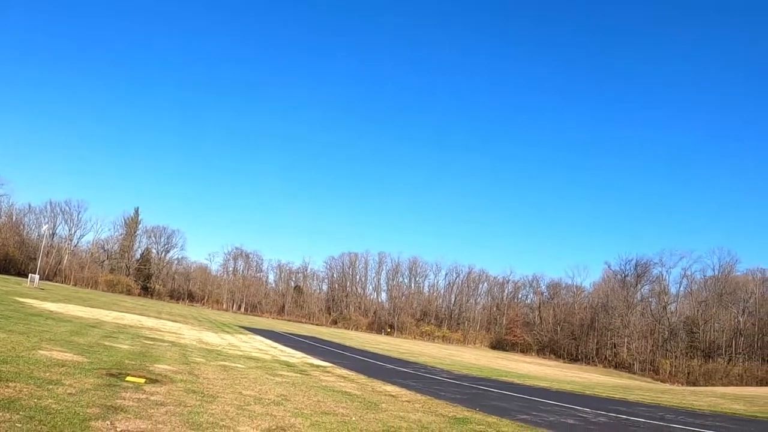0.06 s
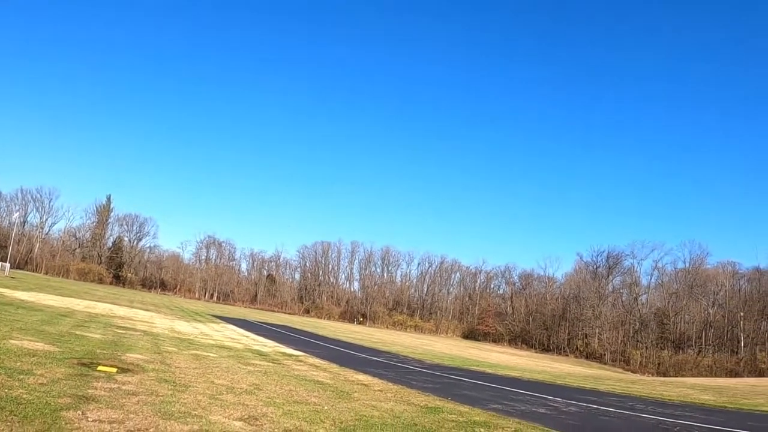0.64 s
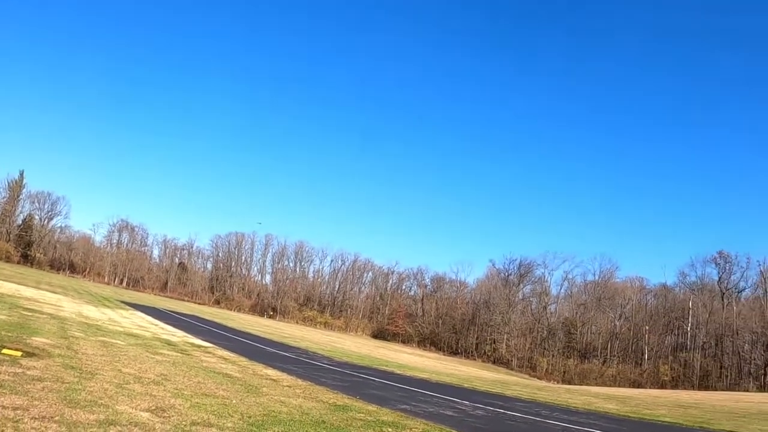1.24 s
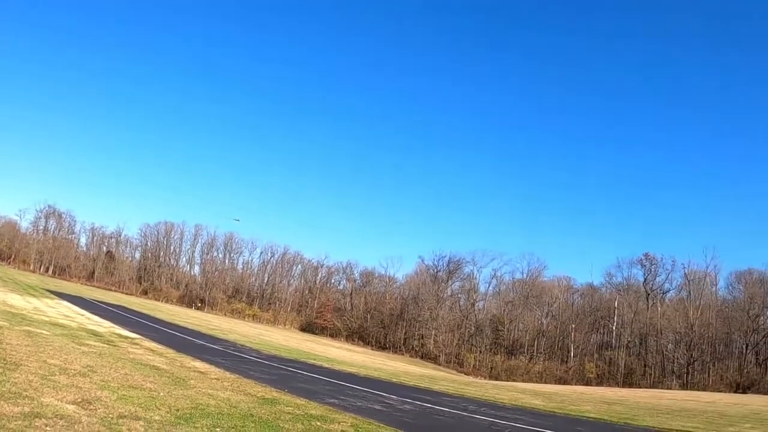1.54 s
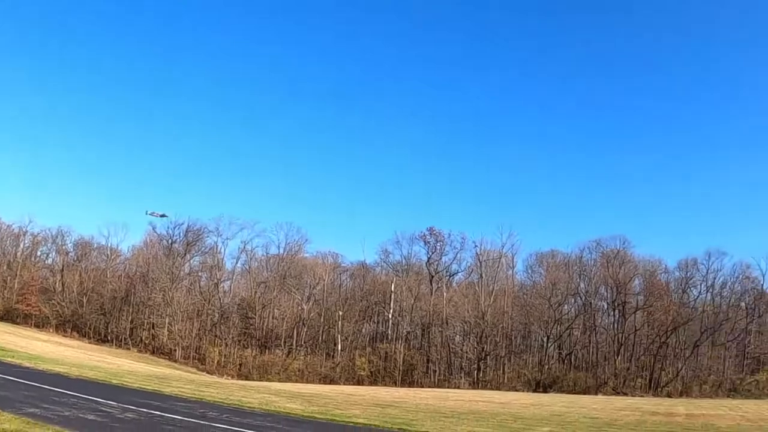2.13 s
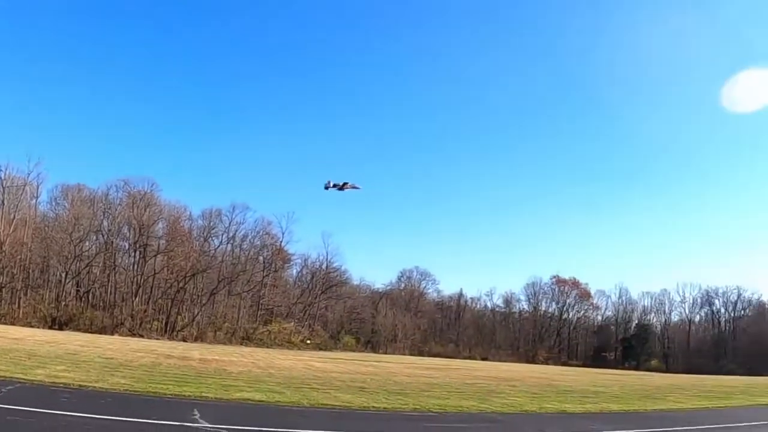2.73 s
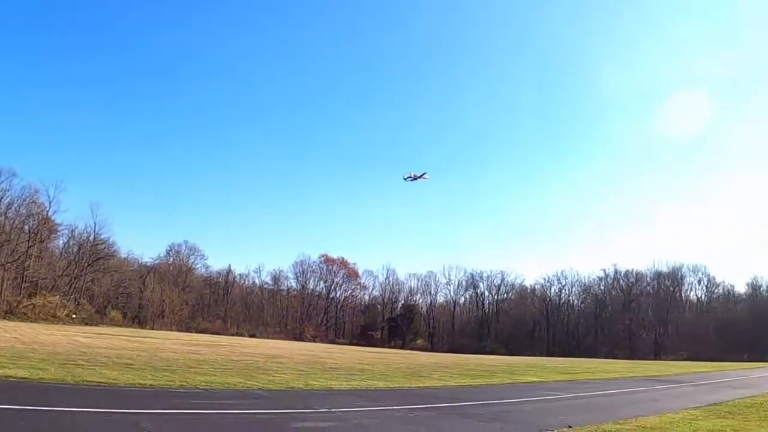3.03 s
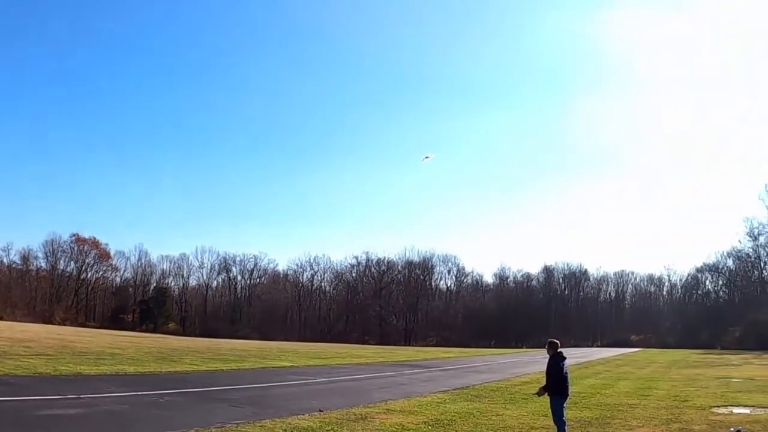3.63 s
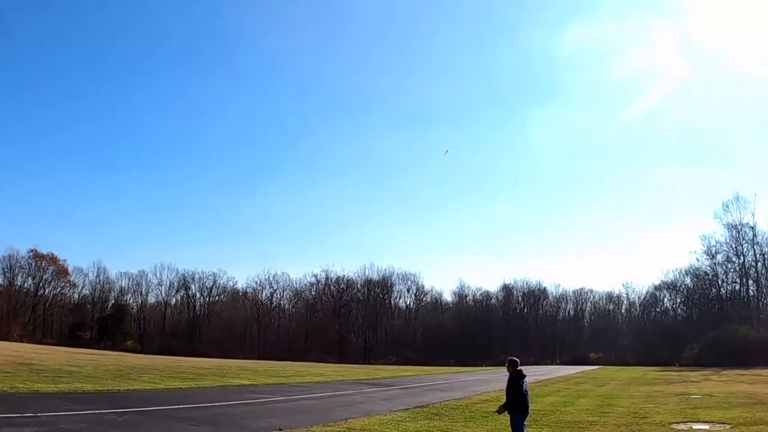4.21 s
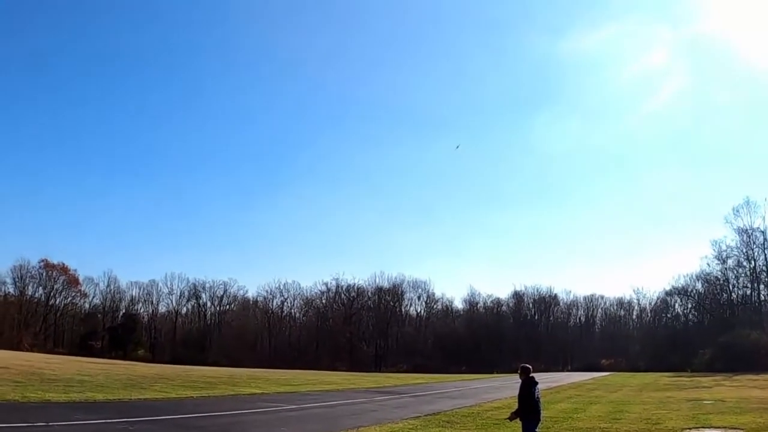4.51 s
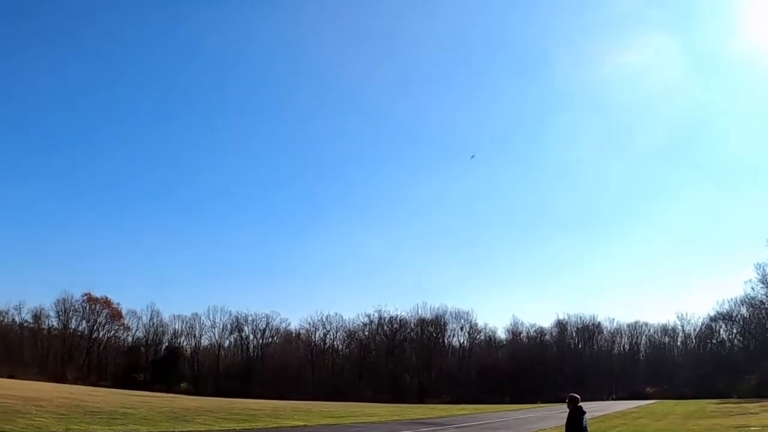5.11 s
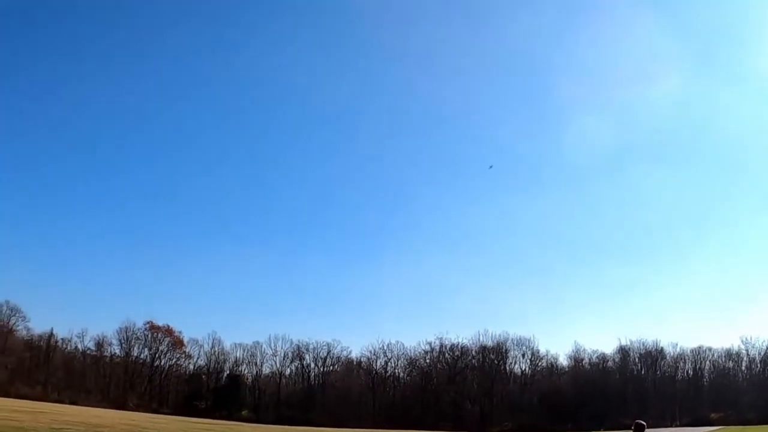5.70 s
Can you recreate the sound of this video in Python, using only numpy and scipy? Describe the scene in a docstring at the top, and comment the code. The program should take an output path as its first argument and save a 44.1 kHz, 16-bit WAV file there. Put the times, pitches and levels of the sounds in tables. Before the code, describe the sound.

A high whine and airy rush swell as a model jet flies by, fading under thumping wind on the microphone.

```python
"""An open field. A model jet with two electric ducted fans passes low, close to a camera.
The fans whine, beat against each other and sink in pitch with the Doppler shift while the pilot
nudges the throttle. Air whistles over airframe edges; the exhaust rushes, combed by its ground echo.
Gusts buffet the microphone ports, mostly the right one."""
import sys
import numpy as np
from scipy import signal
from scipy.fft import rfft, irfft
from scipy.io import wavfile
from scipy.ndimage import uniform_filter1d

SR = 44100
rng = np.random.default_rng(int(sys.argv[2]) if len(sys.argv) > 2 else 0)


def wrap_up_sound(samples):
    """Save the sound to the file named by the first command line argument, as 16-bit audio."""
    columns = np.atleast_2d(samples).T
    # keep every value between -1 and 1, then stretch to whole-number steps
    tamed = np.clip(columns, -1, 1)
    steps = np.round(tamed * 32767).astype(np.int16)
    wavfile.write(sys.argv[1], SR, steps)


N = 262374
TIME = np.arange(N) / SR
PASS_S, SPEED_M_S, NEAREST_M = 2.854, 46.76, 24.12
SOUND_M_S, MIC_HEIGHT_M = 343, 1.6

# breeze, freshening after the pass: (time [s], left [dB], right [dB])
BREEZE = [(0, -50, -49.5), (2.7, -48, -49), (3.2, -41, -38), (5.95, -45, -37)]
# gusts: (start [s], hold [s], left [dB], right [dB])
GUSTS = [(0.096, 0.86, -38.5, -45), (1.729, 0.45, -43, -47), (2.8, 0.12, -38, -46), (3.2, 0.2697, -34, -29),
         (3.56, 0.19, -37.5, -19), (3.604, 0.058, -47, -9), (3.785, 0.153, -35, -23.5),
         (3.99, .17, -37, -19.5), (4.566, 0.23, -38, -26.5), (5.384, 0.095, -42, -26),
         (5.541, 0.36, -40, -19), (5.801, 0.019, -49, -14)]
# eddies in a moderate gust: (frequency [Hz], relative density [dB])
EDDY_SPECTRUM = [(5, -43.5), (22, -5.5), (40, 0.5), (70, 2), (110, -3.5), (160, -12), (220, -22.5),
                 (320, -37), (450, -52.5), (2500, -125)]
# single sharp eddies: (time [s], port struck, peak [dB], frequency [Hz])
BUFFETS = [(2.403, "both", -32, 188), (3.558, "right", -13, 110), (3.667, "right", -21, 340),
           (3.712, "right", -12, 150), (3.842, "right", -18, 200), (4.001, "right", -14.5, 215),
           (4.068, "right", -18, 180), (4.148, "right", -14, 115), (4.18, "right", -17, 175),
           (4.245, "right", -17, 125), (5.765, "right", -16, 190), (5.813, "right", -14.5, 345),
           (5.88, "right", -14, 160)]
# jet's bearing at the ports: (time [s], left lag [ms], left over right [dB])
BEARING = [(0, 0.019, 3), (2.5, 0.013, 2.5), (3.3, 0.028, 1.53), (4.5, 0.032, 0.5)]
# dive and climb, sets the echo lag: (time [s], height [m])
JET_HEIGHT = [(0, 33.1), (.65, 22.4), (1.25, 16.5), (2.2, 9.7), (2.65, 7.7), (3.17, 9.1), (3.9, 17),
              (4.7, 30), (5.95, 52.6)]
# a tone or the treble briefly swells or fades: (time [s], half length [s], target, lift [dB])
SWELLS = [(.12, 0.16, "duct", 23), (0.627, .085, "duct", 16), (.967, 0.17, "duct", 21),
          (2.26, 0.089, "duct", -8), (3.252, .1, "duct", 10.5), (4.282, 0.12, "duct", 16.5),
          (4.82, .1, "duct", 9), (5.478, 0.072, "duct", 8.5), (5.71, 0.071, "duct", 7.5),
          (5.909, 0.05, "duct", 7), (2.774, 0.037, "lead duct", 18), (3.24, 0.11, "lead duct", 20.5),
          (3.9, .6, "lead duct", 14), (5.098, .11, "lead duct", 24.5), (5.304, .14, "lead duct", 27.5),
          (0.76, 0.13, "blade", 7.5), (1.2, 0.081, "blade", 9), (2.14, .16, "blade", 9.5),
          (2.95, .16, "blade", -9.5), (4.99, .3, "blade", 10.5), (1.71, .24, "octave", 19),
          (2.19, 0.15, "octave", 19), (3.85, .45, "octave", 13), (0.47, .19, "thin", 13),
          (.948, 0.23, "thin", 11.5), (1.505, 0.051, "thin", 11), (2.23, 0.16, "thin", 4.5),
          (5.83, 0.082, "thin", 13), (2.74, 0.093, "low", 12.5), (3.11, 0.12, "middle", 9.5),
          (3.5, 0.064, "high", 7.5), (3.15, 0.095, "top", 12.5), (0.66, 0.44, "treble", 20),
          (1.32, 0.33, "treble", 15), (2.62, .04, "order 2", 9.5), (2.98, 0.036, "order 2", 15),
          (3.16, 0.061, "order 2", 10.5), (5.5, 0.68, "order 2", 4), (3.52, 0.38, "order 3", 11),
          (4.3, 0.44, "order 4", 9.5), (1.35, .09, "order 5", 0), (1.4, .057, "order 5", 9),
          (2.14, 0.14, "order 5", 8.5), (2.91, 0.037, "order 5", -14), (3.02, 0.035, "order 5", 9),
          (3.16, .06, "order 5", 23.5), (3.7, .1, "order 5", 14), (3.303, 0.088, "order 6", 11.5),
          (4.45, 0.11, "order 6", 6.5), (3.42, .14, "order 9", 12), (1.7, 0.098, "order 9.4", 12),
          (2.26, 0.2, "order 9.4", 15), (3.14, .037, "order 9.4", 14), (5.392, 0.055, "order 9.4", 14.5),
          (2.564, .06, "order 10", 18.5), (2.983, .044, "order 10", 13.5), (3.302, 0.089, "order 10", 14),
          (5.14, 0.18, "order 10", 10.5)]
# exhaust at the nearest distance: (angle off nose [deg], base density [dB], tilt [dB/octave])
EXHAUST_LOBES = [(10.1, -82, 0), (28.5, -82, 0.5), (48.7, -82.5, -.5), (89.5, -82, -1.5), (145, -80.5, -1),
                 (150.2, -83, 0.7), (162.4, -84.5, -0.75), (169.6, -82.5, -1)]
# radiated rush colour: (rest frequency [Hz], ahead [dB], abeam [dB], behind [dB])
RUSH_SPECTRUM = [(72.5, 22.5, -6.5, 23), (276, 7, 2.5, 2), (586, -7.5, 0.5, -2), (932, 3, 1.5, -14),
                 (1423, 7, 14, 3), (1885, 2, -4, -5.5), (3070, 6.5, -1, 6), (4700, 5.5, 2, 0),
                 (7160, 1.5, -9.5, 5.5), (8140, 11, -6, 3.5), (9580, 0.5, 0, 3), (13600, 13, -37, 6)]
# camera housing's colour on the rush: (frequency [Hz], gain [dB])
HOUSING_GAIN = [(450.0, 1), (620.0, 8), (800.0, 7.5), (1100.0, 3), (1750.0, 6), (1950.0, 2.2),
                (2500.0, 3.5), (3000.0, 2.5), (4500.0, 1.5), (6300.0, 3), (7000.0, 4), (8800.0, -1),
                (12800.0, 8.5), (14500.0, -32)]
# airframe whistles re exhaust: (name, rest pitch [Hz], width [Hz], ahead [dB], abeam [dB], behind [dB])
WHISTLES = [("low", 1634, 10, 12, 35, 3), ("thin", 3130, 4, 33.5, 31, 31), ("middle", 4785, 7, 4, 36, 12),
            ("high", 8090, 70, 27, 41, 20), ("top", 8800, 110, 8, 39, 12)]
# brief whistles: (start [s], end [s], first rest pitch [Hz], last rest pitch [Hz], relative level [dB])
SLIDES = [(-.1, .27, 3405, 3395, 39), (.38, .8, 3392, 3360, 39), (-.05, .27, 2985, 2980, 33),
          (.55, 1.6, 2995, 2855, 36), (1.2, 1.58, 3330, 3235, 36), (1.7, 2.08, 3365, 3270, 31),
          (2.15, 2.68, 1530, 1450, 40), (2.35, 2.95, 1345, 1350, 38), (3.15, 4.0, 4280, 4235, 29),
          (3.8, 5.15, 4280, 4110, 28)]
# slow rise in pitch shared by fan tones and whistles: (time [s], base pitch [Hz])
PITCH_CREEP = [(0, 509.2), (1.95, 507), (5.95, 544.3)]
# throttle nudges: (time [s], spool time [s], shaft rate rise [Hz])
THROTTLE_NUDGES = [(1.99, .03, 14), (2.682, .022, 31.5), (3.187, .033, 38), (3.52, .04, 3.5),
                   (4.28, .05, 3)]
# second fan: (time [s], speed over lead fan [ratio])
TWIN_RATIO = [(0, .9915), (2.6, .9915), (2.8, .9898), (3.3, .9895), (3.7, .985), (5.95, .9862)]
# base levels of main fan tones: (angle off nose [deg], hum [dB], duct [dB], blade [dB], octave [dB])
FAN_LOBES = [(10, -53, -54, -29.5, -60), (18.8, -47, -52, -42, -26), (45, -60, -40.5, -38.5, -55),
             (57.5, -46, -43, -44, -60.5), (81.56, -37, -52.5, -42.5, -48), (122.3, -39.5, -43, -42, -43),
             (132.7, -49, -41.5, -46, -45), (155.8, -50.5, -53, -41, -56), (163.85, -42, -63, -51, -70),
             (167.73, -39, -31, -38.5, -73)]
# weaker fan tones re exhaust: (name, shaft multiple, ahead [dB], abeam [dB], behind [dB])
WEAK_ORDERS = [("order 2", 1.99, 18, 34.8, 24.8), ("order 3", 3.0, 6, 24, 21.2),
               ("order 3", 2.987, 3, 21, 19), ("order 4", 4.01, 23, 24.3, 25.8),
               ("order 5", 5.13, 34.1, 36, 15), ("order 6", 5.89, 4, 20, 24.5),
               ("order 6", 6.02, 0, 23, 25.8), ("order 7", 6.9, 16, 20, 19.4), ("order 9", 9.0, 6, 19, 15),
               ("order 9.4", 9.37, 17, 24, 22), ("order 9.8", 9.8, 13, 4, 15),
               ("order 10", 10.2, 13, 24, 26.5), ("order 12", 11.98, 13, 22, 6.1)]


def amp(db):
    """Decibels to gain."""
    return 10 ** (np.asarray(db) / 20)


def unit_rms(x):
    """Scale to rms 1."""
    return x / np.sqrt(np.mean(x ** 2) + 1e-20)


def curves(table, t=TIME):
    """Table columns, interpolated along the first."""
    knots, *columns = np.transpose(table)
    return [np.interp(t, knots, c) for c in columns]


def spectra(table, hz):
    """Table columns, interpolated over log frequency."""
    knots_hz, *columns = np.transpose(table)
    return [np.interp(np.log(hz + 1), np.log(knots_hz + 1), c) for c in columns]


def drift(rate_hz):
    """Smooth noise, rms 1, up to about rate_hz."""
    steps = N // 64 + 1
    hz = np.fft.rfftfreq(steps, 64 / SR)
    slow = irfft(rfft(rng.standard_normal(steps)) / (1 + (hz / rate_hz) ** 2), steps)
    return np.interp(TIME, np.linspace(0, TIME[-1], steps), unit_rms(slow))


def gusts_db(rise_s=.04, fall_s=.06):
    """Wind strength per port: gusts rise, hold and fall over the breeze."""
    power = amp(curves(BREEZE)) ** 2
    for start_s, hold_s, left_db, right_db in GUSTS:
        before = np.maximum((start_s - TIME) / rise_s, 0)
        after = np.maximum((TIME - start_s - hold_s) / fall_s, 0)
        power += amp([[left_db], [right_db]]) ** 2 * np.exp(-(before + after) ** 2)
    return 10 * np.log10(power)


def wind(gust_db, moderate_db, db_per_octave, ceiling_db=-17.5):
    """Frozen eddies sweep past a port; a stronger gust moves them faster: louder, brighter."""
    hz = np.fft.rfftfreq(8 * SR, 1 / SR)
    eddies = unit_rms(irfft(rfft(rng.standard_normal(8 * SR)) * amp(spectra(EDDY_SPECTRUM, hz)[0])))
    lumps_db = 1.8 * drift(18.6)
    travel = np.cumsum(2 ** ((gust_db + lumps_db - moderate_db) / db_per_octave))
    pressure = np.interp(travel % len(eddies), np.arange(len(eddies)), eddies) * amp(lumps_db)
    level = amp(gust_db) / np.hypot(1, amp(gust_db - ceiling_db))
    return level * pressure / np.sqrt(uniform_filter1d(pressure ** 2, size=4000) + 1e-12)


def buffets():
    """A small vortex crosses a port: one pressure dip between two swells."""
    out = np.zeros((2, N))
    for at_s, port, peak_db, hz in BUFFETS:
        u = (np.pi * hz * (TIME - at_s)) ** 2
        struck = np.array([[port != "right"], [port != "left"]])
        out += struck * amp(peak_db) * (2 * u - 1) * np.exp(-np.minimum(u, 50))
    return out


def flight(t=TIME):
    """Straight fly-by at arrival times t: (distance [m], Doppler factor, angle off nose [deg])."""
    along_m = SPEED_M_S * np.linspace(-6, 6, 3000)
    distance_m = np.hypot(NEAREST_M, along_m)
    arrival_s = PASS_S + along_m / SPEED_M_S + (distance_m - NEAREST_M) / SOUND_M_S
    doppler = 1 / (1 + SPEED_M_S * along_m / distance_m / SOUND_M_S)
    angle_deg = np.degrees(np.arctan2(NEAREST_M, -along_m))
    return [np.interp(t, arrival_s, c) for c in (distance_m, doppler, angle_deg)]


def facing(doppler, ahead, abeam, behind):
    """Blend three values by the side the jet shows, derived from the Doppler factor."""
    cosine = np.clip((1 - 1 / doppler) * SOUND_M_S / SPEED_M_S, -1, 1)
    return abeam + np.maximum(cosine, 0) * (ahead - abeam) + np.maximum(-cosine, 0) * (behind - abeam)


def spreading_db(t=TIME):
    """Distance loss re the nearest point."""
    return 20 * np.log10(flight(t)[0] / NEAREST_M)


def air_loss_db(hz, t=TIME, db_per_m_at_10khz=.4779):
    """Treble absorbed by the air on the way."""
    return db_per_m_at_10khz * flight(t)[0] * (hz / 10000) ** 2.17


def swell_db(name):
    """The named tone or the treble briefly swells or fades, in smooth humps."""
    return sum(db * np.exp(-((TIME - at_s) / half_s) ** 2)
               for at_s, half_s, target, db in SWELLS if target == name)


def ground_comb(hz, t=TIME, reflection=.66, scatter_hz=3600):
    """Gain of direct sound plus ground echo; grass scatters the treble."""
    lag_s = 2 * MIC_HEIGHT_M * curves(JET_HEIGHT, t)[0] / flight(t)[0] / SOUND_M_S
    echo = reflection / (1 + (hz / scatter_hz) ** 2)
    return np.sqrt((1 + echo ** 2 + 2 * echo * np.cos(2 * np.pi * hz * lag_s)) / (1 + echo ** 2))


def ports(hz, t=TIME, offset_rad=.29, treble_db_per_octave=-13):
    """Complex left and right port gains for the jet; the left is duller."""
    lag_ms, lean_db = curves(BEARING, t)
    lean_db = lean_db + treble_db_per_octave * np.log2(np.maximum(hz / 6300, 1))
    phase = offset_rad + 2 * np.pi * hz * lag_ms / 1000
    left = amp(lean_db / 2) * np.exp(-.5j * phase)
    return np.array([left, 1 / left]) / np.sqrt((abs(left) ** 2 + abs(left) ** -2) / 2)


def tone(hz, db, flutter_db, blur_rad, flutter_hz=19, in_step_s=2.8):
    """Stereo partial; turbulent air shakes level and phase. The fans' hums align at in_step_s."""
    turns = np.cumsum(hz) / SR
    phase = 2 * np.pi * (turns - np.interp(in_step_s, TIME, turns)) + blur_rad * drift(60)
    level = np.sqrt(2) * amp(db) * unit_rms(amp(flutter_db * drift(flutter_hz)))
    port_gains = np.repeat(ports(hz[::64], TIME[::64]), 64, axis=1)[:, :N]
    return (port_gains * level * np.exp(1j * phase)).real


def exhaust(t=TIME):
    """Exhaust by angle and distance: (base density [dB], tilt [dB/octave])."""
    level_db, tilt = curves(EXHAUST_LOBES, flight(t)[2])
    return level_db - spreading_db(t), tilt


def rush(patch_db=1.5, shimmer_db=.5):
    """Exhaust turbulence: Doppler-shifted, dulled by the air, combed by the ground echo."""
    hz, t, noise = signal.stft(rng.standard_normal((3, N)), SR, nperseg=1024, noverlap=768)
    hz = hz[:, None]
    doppler = flight(t)[1]
    exhaust_db, tilt = exhaust(t)
    db = exhaust_db + facing(doppler, *spectra(RUSH_SPECTRUM, hz / doppler))
    db += tilt * np.log2((hz + 50) / 2000)
    db += spectra(HOUSING_GAIN, hz)[0] - air_loss_db(hz, t)
    db += np.interp(t, TIME, swell_db("treble")) * np.clip(hz / 6000 - 1, 0, 1)
    # moving air focuses and scatters in patches
    patches = uniform_filter1d(rng.standard_normal(db.shape), size=14, axis=0)
    patches = uniform_filter1d(patches, size=12, axis=1)
    db += patch_db * unit_rms(patches) + shimmer_db * np.interp(t, TIME, drift(22))
    coherent = noise[0] * ports(hz, t)
    diffuse = .32 * np.hypot(1, (hz / 7000) ** 2) * noise[1:]
    field = (coherent + diffuse) * ground_comb(hz, t) * amp(db)
    return np.sqrt(SR / 2) * signal.istft(field, SR, nperseg=1024, noverlap=768)[1][:, :N]


def whistles(clean_width_hz=14):
    """Air sings over airframe edges, Doppler-shifted; breathy when wider than clean_width_hz."""
    doppler, exhaust_db = flight()[1], exhaust()[0]
    creep = curves(PITCH_CREEP)[0] / PITCH_CREEP[1][1]
    out = np.zeros((2, N))
    for name, rest_hz, width_hz, *sides_db in WHISTLES:
        hz = rest_hz * creep * doppler
        db = exhaust_db + facing(doppler, *sides_db) + swell_db(name) - air_loss_db(hz)
        clean_share = 1 / (1 + width_hz / clean_width_hz)
        breath = np.sqrt(1 - clean_share) * (drift(width_hz) + 1j * drift(width_hz))
        envelope = amp(db) * ground_comb(hz) * (np.sqrt(2 * clean_share) + breath)
        carrier = np.exp(2j * np.pi * np.cumsum(hz) / SR)
        out += (ports(hz) * envelope * carrier).real
    return out


def sliding_whistles(lift_db=1):
    """Brief whistles catch on the airframe, mostly sink in pitch, and let go."""
    doppler, exhaust_db = flight()[1], exhaust()[0]
    out = np.zeros((2, N))
    for start_s, end_s, first_hz, last_hz, level_db in SLIDES:
        progress = np.clip((TIME - start_s) / (end_s - start_s), 0, 1)
        hz = (first_hz + (last_hz - first_hz) * progress) * doppler
        db = exhaust_db + level_db + lift_db - air_loss_db(hz)
        arch = np.sqrt(4 * progress * (1 - progress))
        out += arch * tone(hz, db, flutter_db=2.5, blur_rad=.4)
    return out


def hum_hz():
    """Lead fan's hum pitch: slow creep plus throttle steps, Doppler-shifted."""
    steps_hz = sum(rise_hz * (1 + np.tanh((TIME - at_s) / spool_s)) / 2
                   for at_s, spool_s, rise_hz in THROTTLE_NUDGES)
    return (curves(PITCH_CREEP)[0] + steps_hz) * flight()[1]


def fans(blades=11, duct_order=4.952):
    """Two fans at slightly different speeds beat: shaft hum, duct and blade tones, weaker orders."""
    lead_hz = hum_hz() * (1 + .0008 * drift(6))
    twin_hz = lead_hz * curves(TWIN_RATIO)[0] * (1 + .0003 * drift(5.2))
    _, doppler, angle_deg = flight()
    hum_db, duct_db, blade_db, octave_db = np.array(curves(FAN_LOBES, angle_deg)) - spreading_db()
    duct_db -= air_loss_db(duct_order * lead_hz)
    blade_db += swell_db("blade") - air_loss_db(blades * lead_hz)
    octave_db += swell_db("octave") - air_loss_db(2 * blades * lead_hz)
    out = tone(lead_hz, hum_db - .2, flutter_db=2, blur_rad=.11)
    out += tone(twin_hz, hum_db + facing(doppler, -9, -4, -12), flutter_db=1, blur_rad=.12)
    out += tone(duct_order * twin_hz, duct_db + swell_db("duct"),
                flutter_db=facing(doppler, 1.2, 3.5, 1.2), blur_rad=facing(doppler, .05, .6, .04))
    # lead duct tone: mostly abeam, where the pair beats roughly
    lead_duct_db = duct_db + swell_db("lead duct") + facing(doppler, -20, 2, -22)
    out += tone(facing(doppler, 5, 5.02, 4.965) * lead_hz, lead_duct_db, flutter_db=3, blur_rad=.65)
    for fan_hz, share_db in ((lead_hz, -.6), (twin_hz, -7)):
        out += tone(blades * fan_hz, blade_db + share_db, flutter_db=facing(doppler, 1, 3.5, 1),
                    blur_rad=facing(doppler, .15, .6, .2), flutter_hz=12)
        out += tone(2 * blades * fan_hz, octave_db + share_db, flutter_db=4, blur_rad=.7)
    exhaust_db = exhaust()[0]
    for name, order, *sides_db in WEAK_ORDERS:
        hz = order * lead_hz * (1 + .0012 * drift(6))
        db = exhaust_db + facing(doppler, *sides_db) + swell_db(name)
        partial = tone(hz, db, flutter_db=2.5, blur_rad=facing(doppler, .2, .7, .25), flutter_hz=14)
        out += ground_comb(hz) * partial
    return out


def scene():
    """Wind on each port, jet in open air."""
    left_db, right_db = gusts_db()
    port_wind = np.array([wind(left_db, moderate_db=-38, db_per_octave=40),
                          wind(right_db, moderate_db=-32, db_per_octave=21)])
    jet = fans() + whistles() + sliding_whistles() + rush()
    return port_wind + buffets() + jet


def record(dry, fade_s=.015, cutoff_hz=14500):
    """End fades and low-pass."""
    fades = np.minimum(np.minimum(TIME, TIME[::-1]) / fade_s, 1)
    lowpass = signal.firwin(511, cutoff_hz, window=("kaiser", 9), fs=SR)
    return signal.oaconvolve(dry * fades, lowpass[None], "same")


dry = scene()
out = record(dry)
wrap_up_sound(out)
```